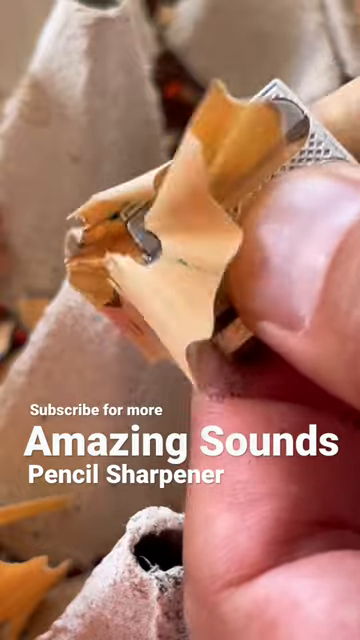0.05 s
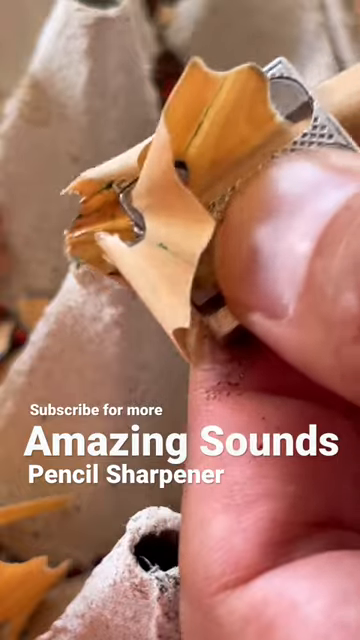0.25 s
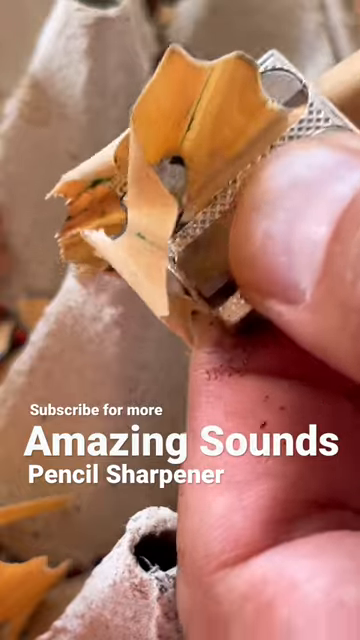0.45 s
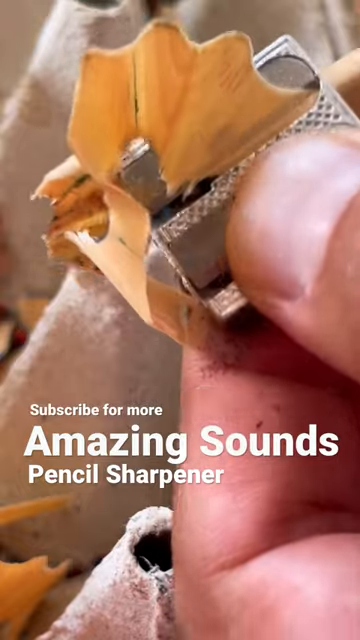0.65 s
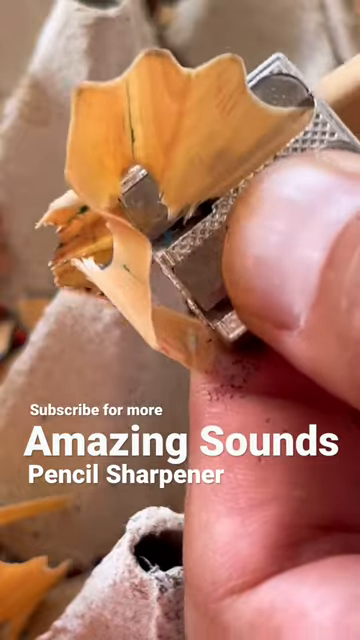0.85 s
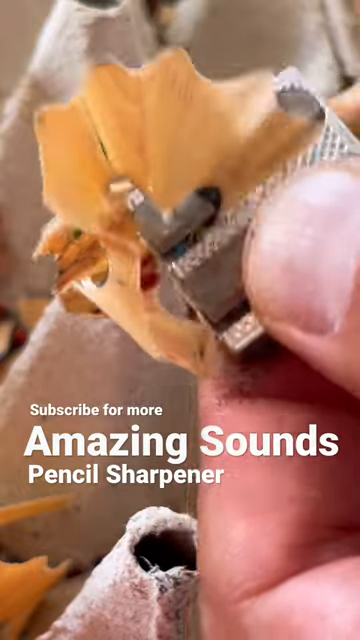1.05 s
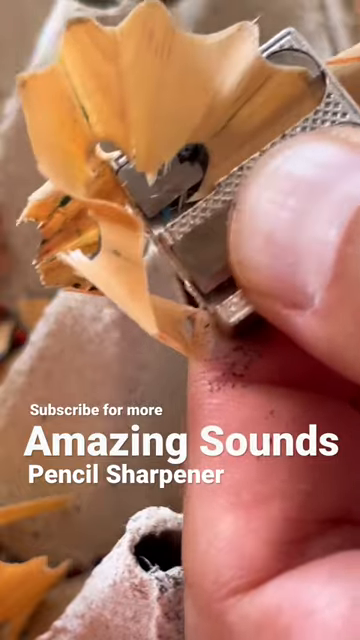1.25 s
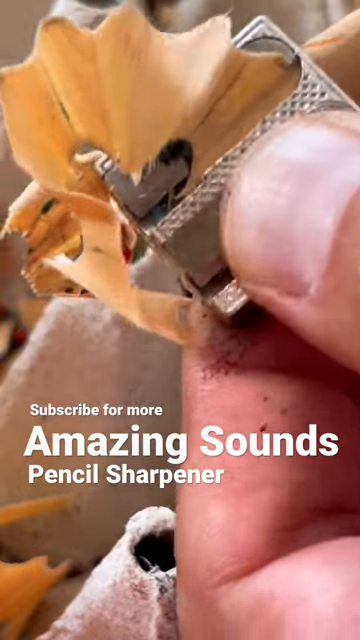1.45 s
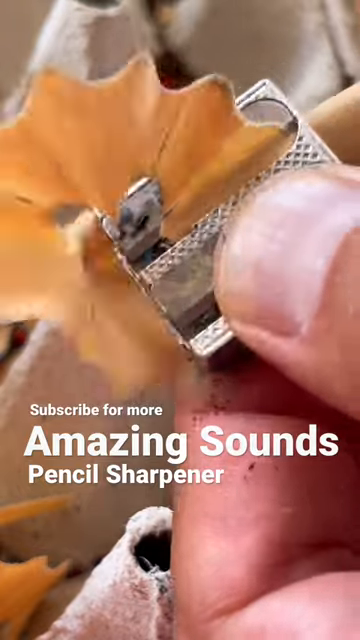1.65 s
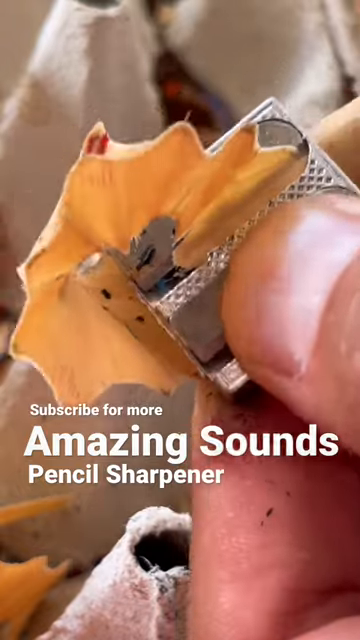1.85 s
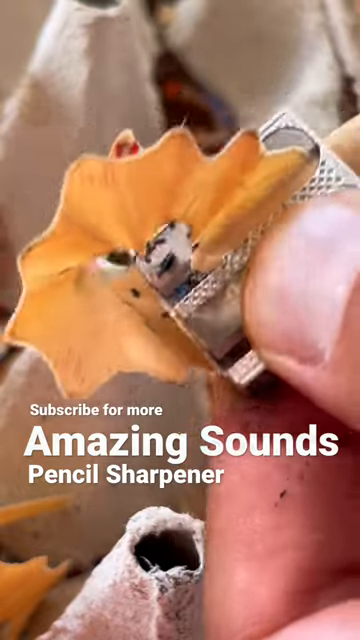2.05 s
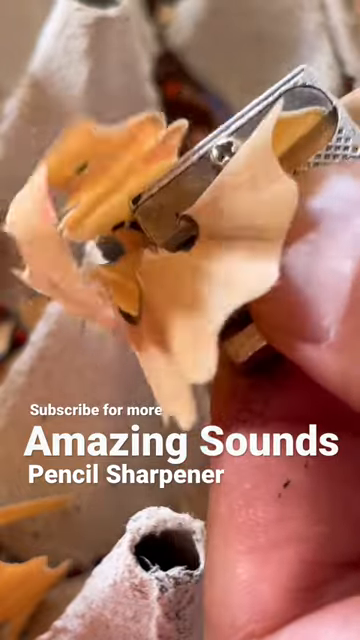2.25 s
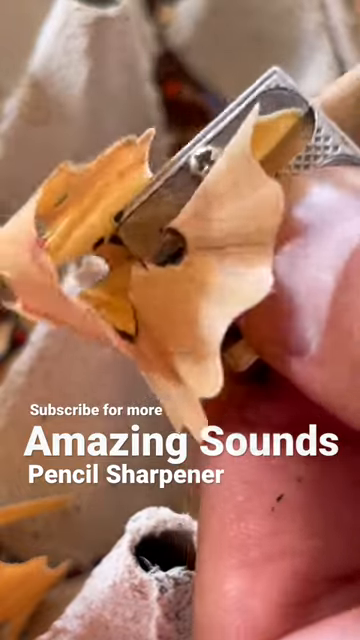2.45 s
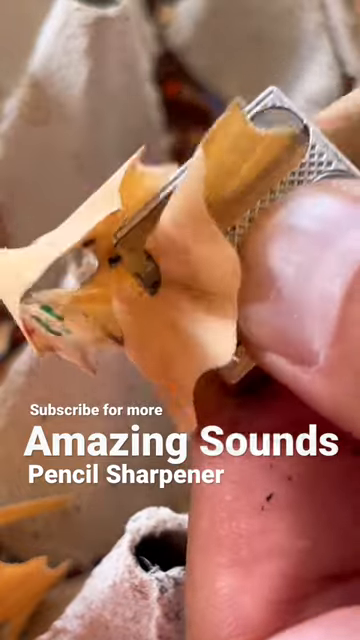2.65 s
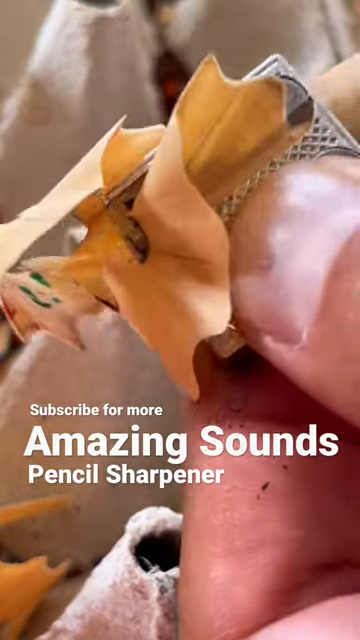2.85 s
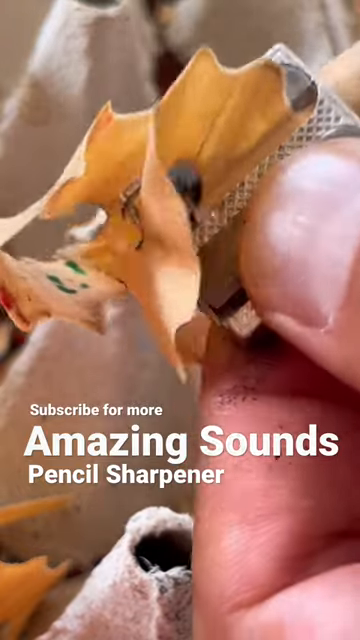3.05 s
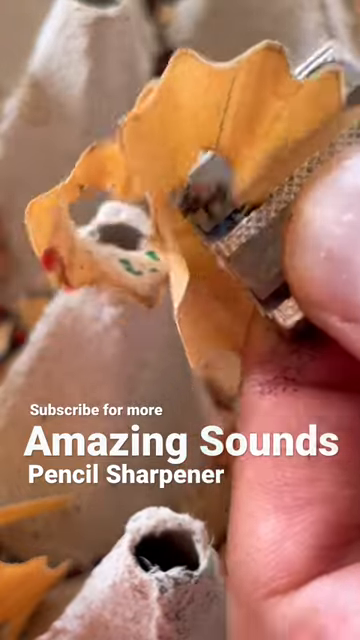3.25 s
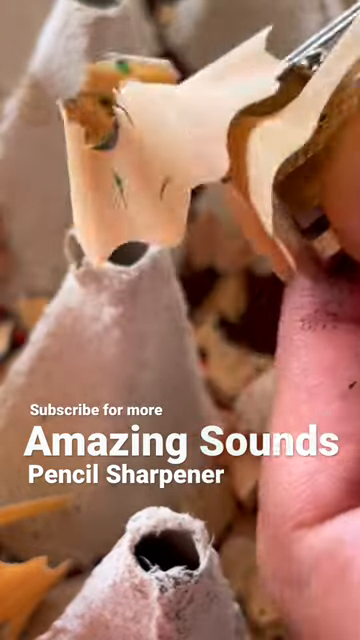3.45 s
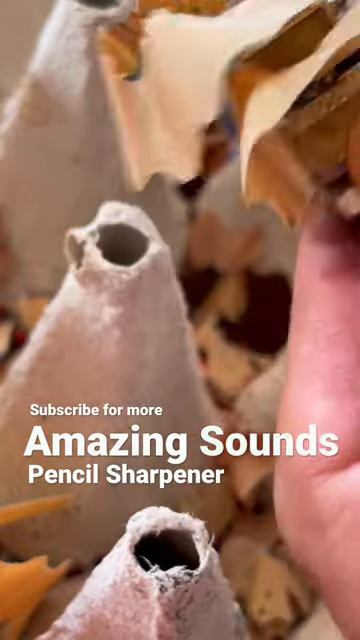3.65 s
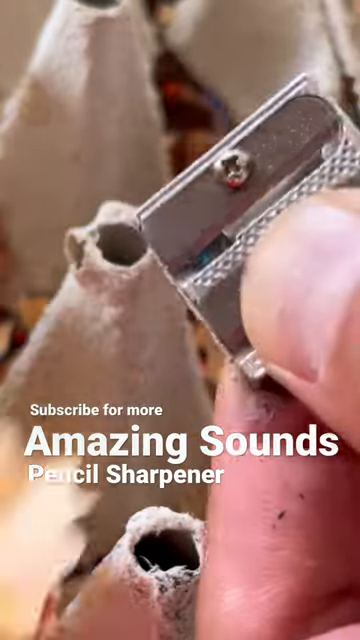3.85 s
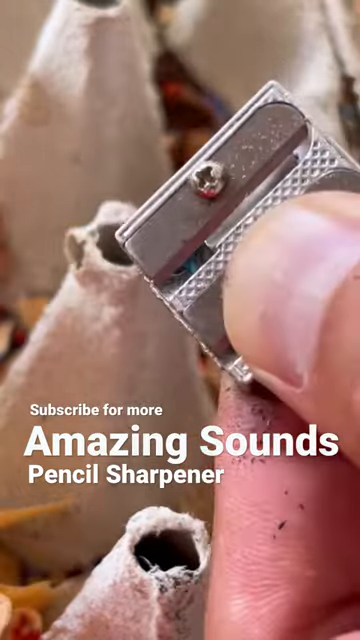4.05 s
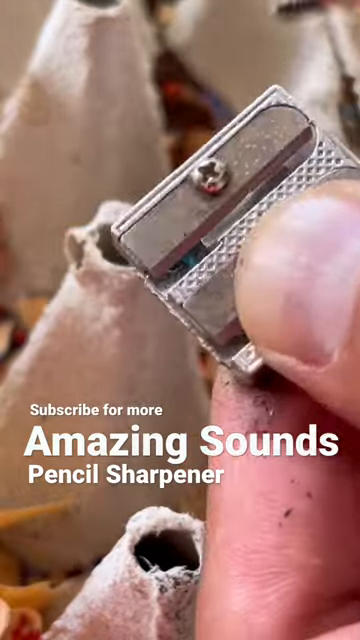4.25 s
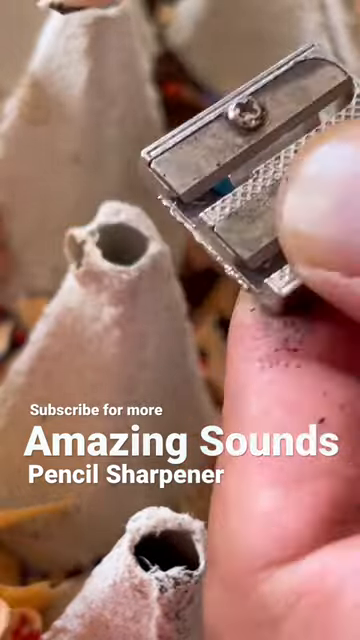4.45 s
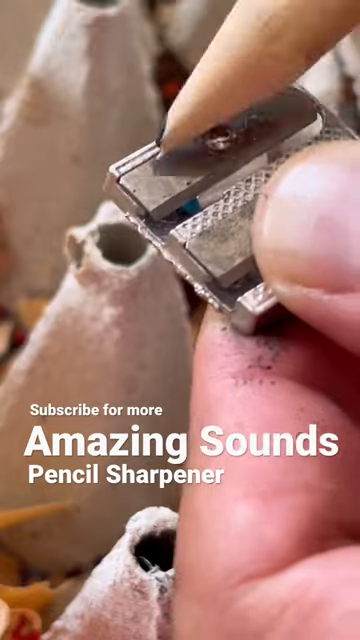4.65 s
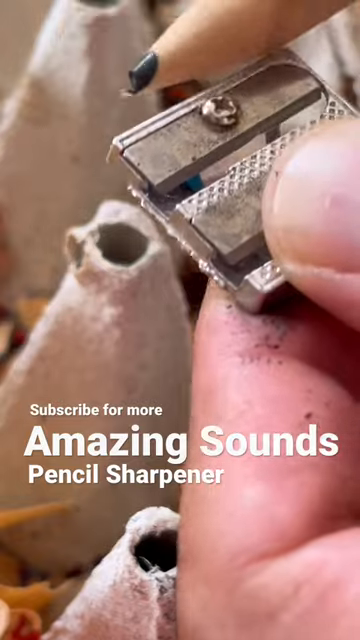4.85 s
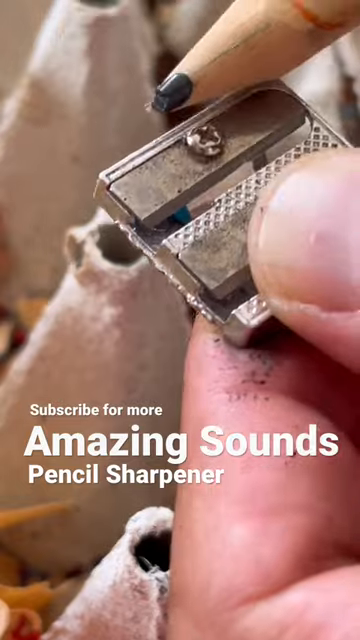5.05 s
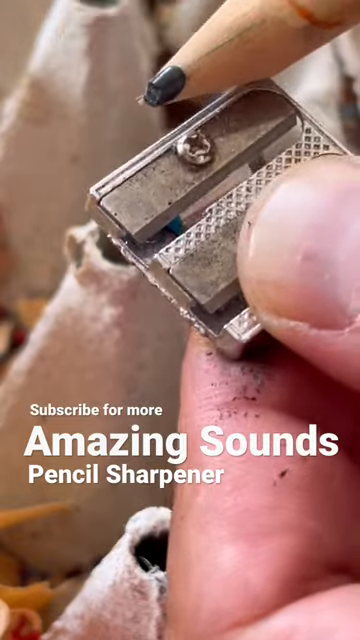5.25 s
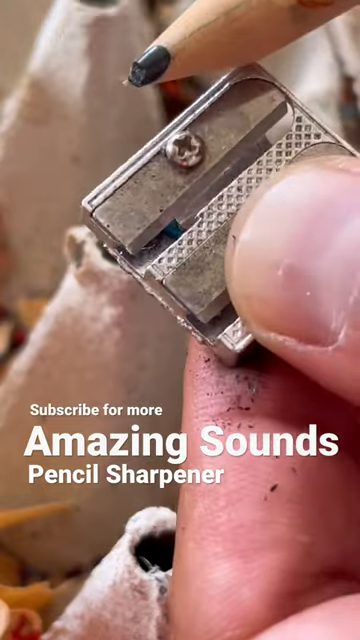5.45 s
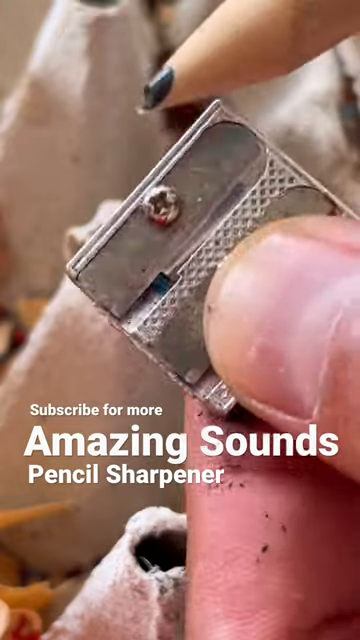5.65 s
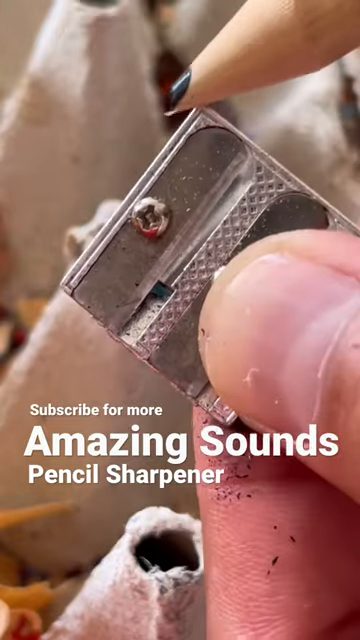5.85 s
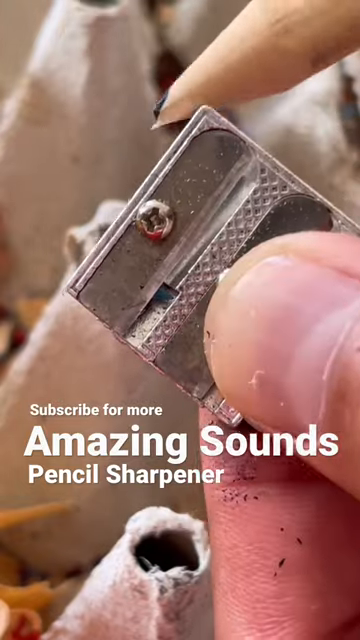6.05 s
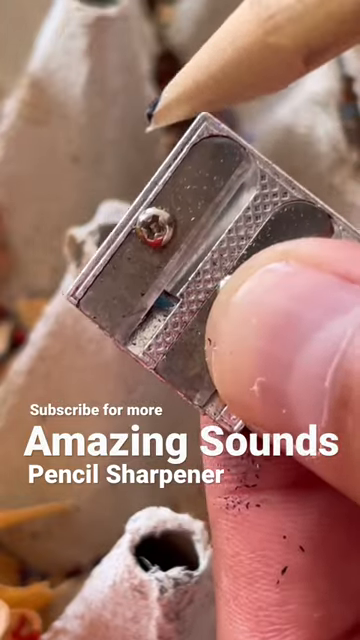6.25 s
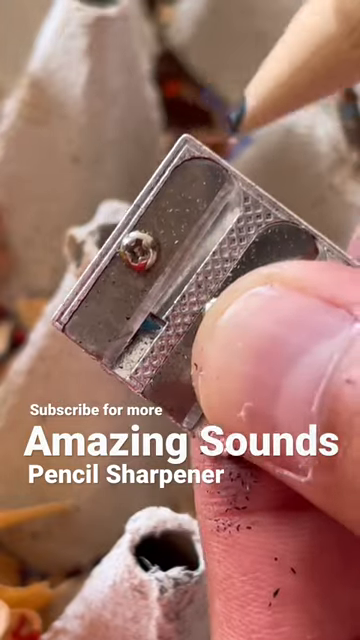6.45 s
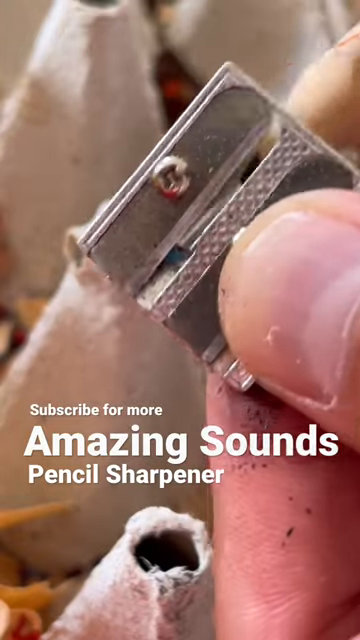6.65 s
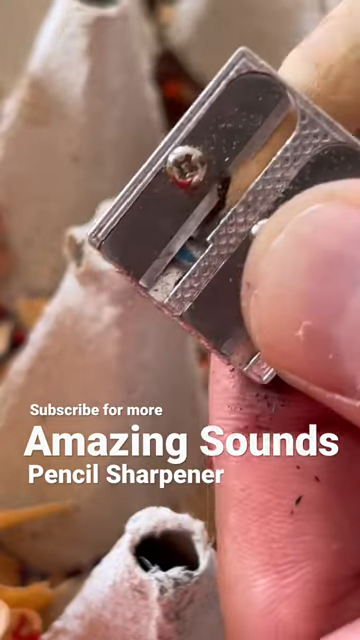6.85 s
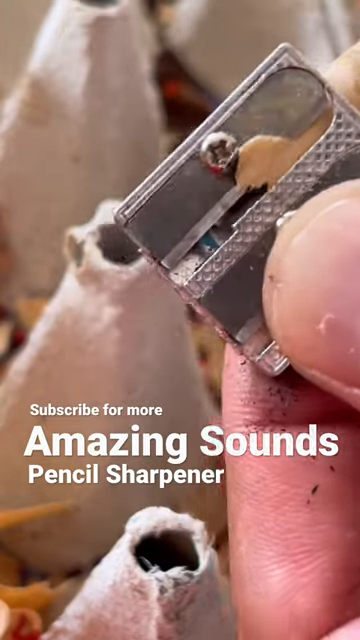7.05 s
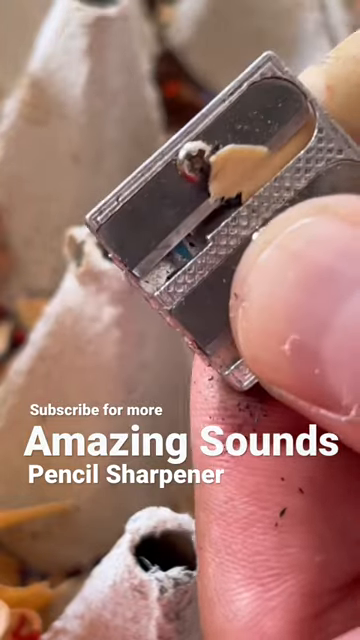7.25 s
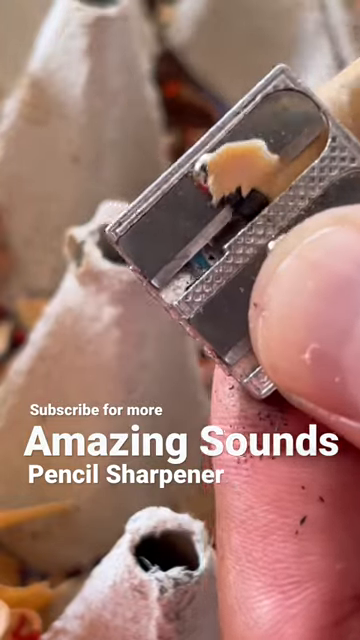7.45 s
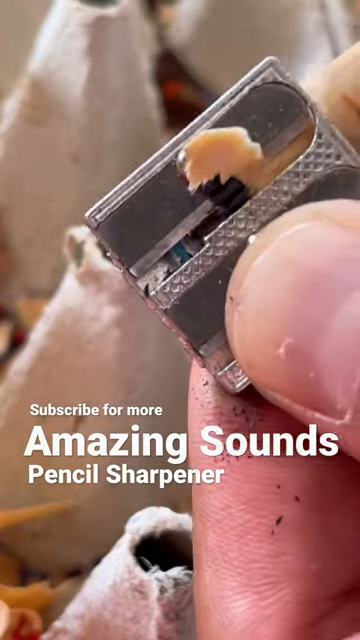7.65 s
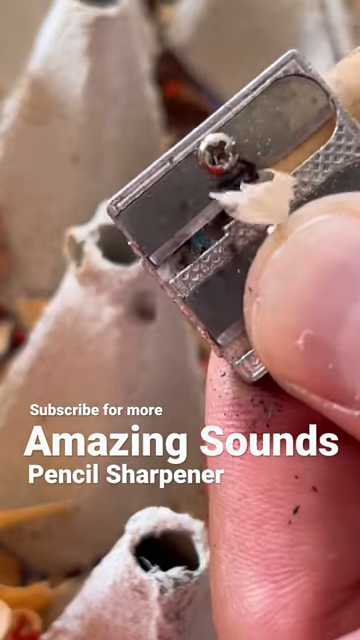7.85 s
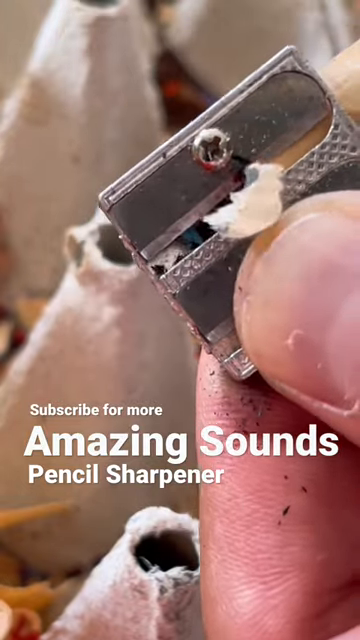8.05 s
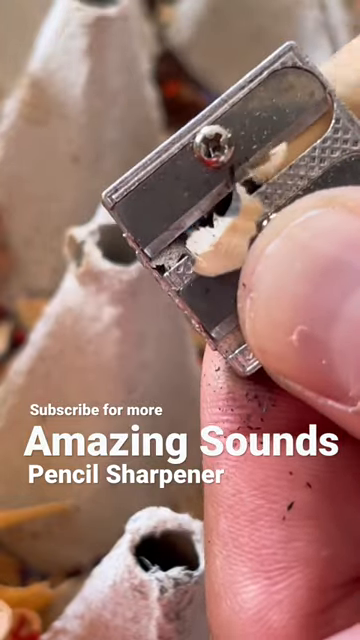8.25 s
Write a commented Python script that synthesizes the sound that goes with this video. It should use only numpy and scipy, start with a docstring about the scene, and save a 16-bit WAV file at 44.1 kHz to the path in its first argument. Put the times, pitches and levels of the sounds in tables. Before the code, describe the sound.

Seven or so crisp, hissing wood-slicing strokes, each building and cutting off sharply, with light rubbing back between them. Weaker, quicker scrapes follow, then a papery drop and cardboard knock. A quieter middle holds small metallic clicks, skin rubs and low handling bumps. Finally the pencil goes back in, crackling and grinding. Close microphone, little room tail, faint low drone and air beneath.

```python
"""A wooden pencil is twisted in a small metal hand sharpener, close to the microphone in a quiet room.
Each twist swells as the blade slices and tears the wood: random fibre breaks and hiss, coloured by patches.
Between twists the pencil rubs back and the shaving crackles in short bursts of noise.
The shaving knocks on a cardboard egg tray, the lead taps and slides on ringing metal, fingers brush and creak,
then the pencil goes back in for more twists. Low handling bumps and a drone with faint air lie underneath."""
import sys
import numpy as np
from scipy import signal
from scipy.fft import rfft, irfft, next_fast_len
from scipy.io import wavfile

SR = 44100
rng = np.random.default_rng(int(sys.argv[2]) if len(sys.argv) > 2 else 0)


def persist_wave(psi):
    """Save psi, clipped to +-1, as 16-bit WAV."""
    counts = np.round(np.clip(psi, -1, 1) * 32767).astype(np.int16)
    wavfile.write(sys.argv[1], SR, np.atleast_2d(counts).T)


N = 366471
TIME = np.arange(N) / SR
BURST_S = .004  # a contact's level is its rms over this time


def from_db(db):
    """Decibels to gain."""
    return 10 ** (np.asarray(db) / 20)


def rms_one(x):
    """Scale to rms 1."""
    return x / np.sqrt(np.mean(x ** 2) + 1e-20)


def drift(rate):
    """Wandering random curve of rms 1 with about `rate` random points a second, joined by straight lines."""
    knots = rng.standard_normal(N // 8)
    return rms_one(np.interp(TIME * min(rate, 5000), np.arange(len(knots)), knots))


def colour(spectrum, vary_db=0, size=4096):
    """Minimum-phase impulse response of unit energy with the given spectrum, each point varied by chance."""
    hz, db = np.transpose(spectrum)
    db = db + vary_db * rng.standard_normal(len(db))
    grid = np.maximum(np.arange(size // 2 + 1) * SR / size, 1)
    gain = from_db(np.interp(np.log(grid), np.log(hz), db))
    # keeping only the first half of the cepstrum puts the energy as early as possible
    cepstrum = irfft(np.log(gain))
    first_half = np.arange(size) < size // 2
    response = irfft(np.exp(rfft(2 * cepstrum * first_half)))
    return response / np.linalg.norm(response)


def low_passed(x, edge_hz=11500):
    """A steep low-pass at edge_hz."""
    return signal.sosfilt(signal.butter(10, edge_hz, fs=SR, output="sos"), x)


def ringing(modes, tilt_db=0, size=4096):
    """Unit-energy ring of a body's decaying modes; a harder contact tilts it towards the high ones."""
    hz, width, db = np.transpose(modes)[:, :, None]
    t = np.arange(size) / SR
    strength = width * from_db(db + tilt_db * np.log2(hz / hz[0]))
    decay = np.exp(-np.pi * width * t)
    response = np.sum(strength * decay * np.cos(2 * np.pi * hz * t), axis=0)
    response = low_passed(response, edge_hz=10850)
    return response / np.linalg.norm(response)


def through(x, response):
    """Pass a signal through an impulse response."""
    return signal.oaconvolve(x, response)[:N]


def swells(rows, edge_db):
    """Gain of gestures that rise to their loudest moment and fade, edge_db lower at both ends."""
    gain = np.zeros(N)
    for start, loudest, end, db in rows:
        span = slice(max(int(start * SR), 0), int(end * SR))
        levels = [db - edge_db, db, db - edge_db]
        gain[span] += from_db(np.interp(TIME[span], [start, loudest, end], levels))
    return gain


def add(out, s, db, response, fade_s, size=1024):
    """One contact: a short crumble of noise builds, dies and excites a body."""
    age = np.arange(size) / (SR * fade_s)
    push = rng.standard_normal(size) * np.sqrt(age) * np.exp(-age)
    hit = signal.fftconvolve(push, response)
    hit *= from_db(db) * np.sqrt(BURST_S * SR) / np.linalg.norm(hit)
    start = int(s * SR)
    out[start:start + len(hit)] += hit[:N - start]


def fractures(per_s, spread_db, hiss):
    """Fibres break at random with uneven sizes, over the smooth hiss of friction; rms 1."""
    chance = np.clip(per_s / SR * np.ones(N), 1e-4, 1)
    at = rng.random(N) < chance
    sizes = rng.laplace(0, 1, N)[at]
    breaks = np.zeros(N)
    # dividing by the root of the chance keeps sparse and dense stretches equally loud
    breaks[at] = np.sign(sizes) * from_db(spread_db * np.minimum(abs(sizes), 4)) / np.sqrt(chance[at])
    return rms_one(rms_one(breaks) + hiss * rng.standard_normal(N))


# spectrum of the room tone: (frequency [Hz], relative level [dB per Hz])
ROOM_SPECTRUM = [(15, -37), (38, -11), (50, -8.5), (68, 4.5), (100, -9), (160, -10), (330, -25.5),
                 (700, -24.5), (1200, -30), (1800, -29.5), (2800, -45), (7000, -48), (11000, -44),
                 (14000, -69.5)]


def room_tone(side_db):
    """A low drone, alike on both sides, under faint air noise that is diffuse in the midrange."""
    mid, side = (through(rng.standard_normal(N), colour(ROOM_SPECTRUM)) for _ in range(2))
    side = signal.sosfilt(signal.butter(2, [300, 1400], "band", fs=SR, output="sos"), side)
    return from_db(-61) * (mid + from_db(side_db) * side * [[1], [-1]])


def reflections(x, tail_db):
    """A short, weak room tail of fading noise, different on each side."""
    t60_s = 0.084
    t = TIME[:SR // 2]
    tails = rng.standard_normal((2, len(t))) * from_db(-60 * t / t60_s) * (t > .003)
    return from_db(tail_db) * np.array([through(x, tail / np.linalg.norm(tail)) for tail in tails])


# the hands bump and rumble: (start [s], loudest [s], end [s], level [dB])
HAND_BUMPS = [(3.1, 3.33, 3.36, -55), (3.88, 3.945, 4.1, -53), (6.05, 6.2, 6.54, -53),
              (6.4, 6.58, 7.7, -58), (6.73, 6.77, 6.906, -45), (6.8, 7.03, 8.4, -61.5)]
# spectrum of the bumps: (frequency [Hz], relative level [dB per Hz])
RUMBLE_SPECTRUM = [(15, -29), (35, -7.5), (68, 6), (110, -9.5), (230, -11.5), (400, -30.5), (1200, -60)]


def handling():
    """Low, soft bumps of the hands: swelling noise with a rumble's spectrum."""
    return swells(HAND_BUMPS, edge_db=15.5) * through(rng.standard_normal(N), colour(RUMBLE_SPECTRUM))


# fingers shift their grip: (start [s], loudest [s], end [s], level before the low-pass [dB])
FINGER_RUBS = [(3.87, 3.885, 4.01, -48), (4.20, 4.25, 4.44, -72), (4.46, 4.49, 4.64, -66.5),
               (5.445, 5.47, 5.59, -59), (5.67, 5.81, 5.85, -62.5), (5.82, 5.86, 5.95, -61.5),
               (6.13, 6.18, 6.28, -61.5), (6.255, 6.27, 6.38, -60), (6.30, 6.37, 6.46, -65.5),
               (6.45, 6.50, 6.7, -66)]
# spectrum of dry skin: (frequency [Hz], relative level [dB per Hz])
SKIN_SPECTRUM = [(150, -1), (400, 10.5), (1000, 7), (2200, 1), (4000, 3), (6500, 2), (9000, 5), (10700, 9),
                 (12000, -12), (15000, -22)]
# the pencil creaks softly in the grip: (start [s], loudest [s], end [s], level [dB])
GRIP_CREAKS = [(0.85, 0.9, 1.006, -61), (1.46, 1.6, 1.75, -59), (2.08, 2.16, 2.25, -58),
               (5.42, 5.47, 5.7, -72), (5.75, 5.86, 6.2, -65.5), (6.1, 6.25, 6.66, -73),
               (7.04, 7.11, 7.3, -63.5), (7.35, 7.44, 7.9, -68)]
# spectrum of the creaks: (frequency [Hz], relative level [dB per Hz])
GRIP_SPECTRUM = [(120, -11), (300, -1.5), (600, 3), (1300, -4), (2000, -7.5), (3500, -30)]


def fingers():
    """Dry skin brushes over wood, metal and shaving as noise; the pencil creaks in the grip by small slips."""
    skin = through(rng.standard_normal(N), low_passed(colour(SKIN_SPECTRUM)))
    slips = through(fractures(350, spread_db=1.5, hiss=.5), colour(GRIP_SPECTRUM))
    return swells(FINGER_RUBS, edge_db=24.5) * skin + swells(GRIP_CREAKS, edge_db=17.5) * slips


# the shaving lands and bounces: (time [s], rustle before trim [dB], cardboard knock before trim [dB])
SHAVING_LANDING = [(3.8619, -60, -41), (3.8774, -43.5, -38), (3.9085, -57, -42), (3.9197, -58, -44.5),
                   (3.945, -63, -54.5)]
# resonances of the egg tray: (frequency [Hz], width [Hz], relative level before tilt [dB])
CARDBOARD_MODES = [(785, 150, -14), (965, 240, 11.5), (1570, 150, 7), (2230, 300, 7.5), (2450, 198, -3),
                   (3100, 290, -19), (4230, 580, -18)]


def landing():
    """The loose shaving rustles as it hits the tray, which answers with a hollow knock."""
    out = np.zeros(N)
    for s, rustle_db, knock_db in SHAVING_LANDING:
        rustle = low_passed(colour(SLICE_SPECTRUM, vary_db=3))
        tray = ringing(CARDBOARD_MODES, tilt_db=rng.normal(0, 2.3))
        add(out, s - .001, rustle_db + 5.5, rustle, fade_s=0.0018)
        add(out, s - .001, knock_db - 0.5, tray, fade_s=0.0039)
    return out


# the lead taps the sharpener:
# (time [s], metal ring before trim [dB], tilt [dB per octave], wooden knock [dB])
LEAD_TAPS = [(4.332, -65, 1, -64), (4.3430, -45, 10, -64), (4.374, -49, -6, -41), (4.411, -58, -5, -63),
             (4.658, -32.5, 4, -43.5), (4.735, -54, 10, -64), (6.6794, -48, 0.5, -46.5),
             (6.694, -50, 28, -57)]
# the lead slides on the metal: (start [s], loudest [s], end [s], level [dB], tilt [dB per octave])
LEAD_SLIDES = [(4.339, 4.364, 4.46, -52, 9), (4.447, 4.535, 4.6, -67, 11), (4.645, 4.664, 4.77, -62, -2),
               (4.707, 4.737, 4.78, -54.5, 2), (4.817, 4.845, 4.89, -71.5, -1), (5.932, 6.06, 6.16, -71, 5),
               (6.568, 6.575, 6.8, -69.5, -2.5), (6.596, 6.675, 6.705, -59, 3.5)]
# resonances of the metal body: (frequency [Hz], width [Hz], relative level before tilt [dB])
SHARPENER_MODES = [(1530, 370, -2.5), (2330, 340, -6.5), (4040, 106, 6.5), (4350, 1200, -19),
                   (7070, 200, 0), (10500, 320, -3.5)]
# the graphite core grinds against the edge; a row that ends before it starts is silent:
# (start [s], loudest [s], end [s], level [dB])
LEAD_GRINDS = [(7.72, 7.785, 7.8, -53), (7.92, 8.0, 6.8, -65), (8.18, 8.213, 8.245, -37.5),
               (8.22, 8.3, 8.6, -55.5)]
# resonances of the grinding lead: (frequency [Hz], width [Hz], relative level [dB])
GRAPHITE_MODES = [(3970, 180, 17), (4403, 350, -17), (6100, 160, -15), (6860, 210, -19)]


def lead_on_metal():
    """Taps and gritty slides of the lead ring the sharpener; in the bore the lead grinds with its own ring."""
    grit = fractures(1500, spread_db=6, hiss=0.88)
    out = swells(LEAD_GRINDS, edge_db=24) * through(grit, ringing(GRAPHITE_MODES))
    for *gesture, tilt_db in LEAD_SLIDES:
        out += swells([gesture], edge_db=21.5) * through(grit, ringing(SHARPENER_MODES, tilt_db))
    for s, ring_db, tilt_db, knock_db in LEAD_TAPS:
        add(out, s, ring_db + .5, ringing(SHARPENER_MODES, tilt_db), fade_s=.00006)
        add(out, s, knock_db, colour(TEAR_SPECTRUM), fade_s=0.0011)
    return out


def pressure(bite_s, let_go_s, build_db, fade_s):
    """Gain of one turn of the wrist: it sets in, builds to 1, fades as the wrist stops, and settles."""
    attack_s, attack_db = 0.039, 26.5  # the edge sinks into the wood
    fade_db = 26.5  # drop over the fade, as the wrist stops
    settle_s, settle_db = .09, 20  # then the shaving comes to rest
    stopped_s = let_go_s + fade_s
    times = [bite_s - attack_s, bite_s, let_go_s, stopped_s, stopped_s + settle_s]
    levels = [-build_db - attack_db, -build_db, 0, -fade_db, -fade_db - settle_db]
    gain = np.zeros(N)
    span = slice(max(int(times[0] * SR), 0), int(times[-1] * SR))
    gain[span] = from_db(np.interp(TIME[span], times, levels))
    return gain


# the wrist twists the pencil against the blade, levels on letting go and before the blade's trims:
# (bite [s], let go [s], slicing [dB], tearing [dB], build-up [dB], fade [s])
WRIST_TWISTS = [(0.0, 0.086, -29, -49.5, 10, .028), (0.444, 0.572, -28, -48.5, 19, 0.037),
                (0.976, 1.077, -37, -51.5, 1, .045), (1.517, 1.621, -35, -47.5, 7.5, .1),
                (2.067, 2.171, -30.5, -46, 13, .04), (2.564, 2.693, -31, -47, 13, .03),
                (3.063, 3.215, -44.5, -64.5, -3, .05), (3.234, 3.278, -35.5, -50.5, 2, 0.082),
                (3.313, 3.379, -35.5, -47, 9.5, .05), (3.49, 3.534, -47, -57, -1, .09),
                (3.589, 3.656, -48.5, -55, 5, 0.058), (6.85, 7.075, -43, -67, 12, 0.15),
                (7.388, 7.402, -35, -54.5, 1, 0.034), (7.74, 7.815, -42.5, -62, 1.5, 0.0596),
                (8.199, 8.218, -28.5, -51, 2.5, .04), (8.25, 8.31, -40.5, -67, 7.5, .04)]
# the pencil turns lightly in the bore, without cutting, levels at the start and before the blade's trims:
# (start [s], end [s], slicing [dB], tearing [dB])
LIGHT_RETURNS = [(0.2, 0.333, -62, -72.5), (0.71, 0.87, -61.5, -71), (1.238, 1.35, -60, -79),
                 (1.78, 1.93, -63.5, -73), (2.27, 2.43, -59.5, -67.5), (2.827, 2.962, -61, -71),
                 (3.73, 3.779, -68.5, -69), (6.73, 6.831, -65.5, -72), (7.329, 7.526, -54, -64.5),
                 (7.58, 7.61, -67.5, -63), (7.83, 7.95, -50, -62), (7.971, 8.1, -58.5, -58.5)]


def wrist():
    """Slicing and tearing gain of all twists and of the light returns between them."""
    sag_db, return_fade_s = 4.5, 0.11  # a return slackens by the sag from start to end
    returns = [(start, end, slice_db - sag_db, tear_db - sag_db, -sag_db, return_fade_s)
               for start, end, slice_db, tear_db in LIGHT_RETURNS]
    slicing, tearing = np.zeros((2, N))
    for bite_s, let_go_s, slice_db, tear_db, build_db, fade_s in list(WRIST_TWISTS) + returns:
        gain = pressure(bite_s, let_go_s, build_db, fade_s)
        slicing = np.maximum(slicing, from_db(slice_db) * gain)
        # tearing follows the pressure a little less than in proportion
        tearing = np.maximum(tearing, from_db(tear_db) * gain ** 0.94)
    return slicing, tearing


def crumbs(size=8):
    """Small random snaps over each return and rips late in each twist: rows of (time, crack, knock)."""
    spread_db = 3
    crumbs_per_s, crumb_db, crumb_knock_db = 15, 2.5, 1.5  # levels over the slicing and the tearing
    rips, rip_s, rip_db, rip_knock_db = 3, .06, -8, -2.5  # per twist, in its last moments
    rows = []
    for start, end, slice_db, tear_db in LIGHT_RETURNS:
        times = start + np.cumsum(rng.exponential(1 / crumbs_per_s, size))
        sizes_db = spread_db * rng.standard_normal(size)
        for s, db in zip(times, sizes_db):
            if s < end:
                rows.append((s, slice_db + crumb_db + db, tear_db + crumb_knock_db + db))
    for bite_s, let_go_s, slice_db, tear_db, *_ in WRIST_TWISTS:
        times = let_go_s - rip_s * rng.random(rips)
        sizes_db = spread_db * rng.standard_normal(rips)
        for s, db in zip(times, sizes_db):
            if bite_s < s < TIME[-1]:
                rows.append((s, slice_db + rip_db + db, tear_db + rip_knock_db + db))
    return rows


# the loud splinters: (time [s], bright crack before trim [dB], woody knock before trim [dB])
LOUD_SNAPS = [(0.2064, -53, -65.5), (0.274, -48, -65), (0.5556, -30, -68), (0.8876, -53, -66),
              (0.9169, -50, -61.5), (0.942, -44.5, -74), (1.1618, -48.5, -68), (1.2043, -54, -60),
              (1.2153, -51, -65), (1.4773, -56, -67), (1.6274, -48, -42.5), (1.6842, -50, -50.5),
              (1.6994, -37, -50), (1.7832, -55, -62), (2.1154, -27, -60), (2.2858, -54, -72),
              (2.3018, -43, -64), (2.669, -27.5, -58), (2.833, -52, -69), (2.908, -50.5, -58),
              (3.06, -46, -66), (3.3604, -34, -50), (3.4909, -52, -50), (3.5137, -44, -50),
              (3.5507, -47, -54), (3.5916, -49, -53.5), (3.6532, -34.5, -43), (3.6726, -44.5, -44.5),
              (6.8446, -46.5, -59), (7.4607, -32.5, -49.5), (7.4945, -44, -57), (7.579, -50, -53.5),
              (7.6581, -55, -52), (7.6826, -48, -62), (7.7253, -37, -48.5), (7.7842, -34, -53),
              (7.8045, -24.5, -38.5), (7.819, -40, -49.5), (7.9593, -35, -49.5), (7.972, -42, -48),
              (8.0, -40, -43), (8.035, -47.5, -48.5), (8.1303, -52, -40.5), (8.216, -31, -54)]


def splinters():
    """Single snaps of the shaving and crumbs of lead, no two alike; the low-pass opens for loud cracks."""
    out = np.zeros(N)
    for s, crack_db, knock_db in list(LOUD_SNAPS) + crumbs():
        edge_hz = np.interp(crack_db, [-50, -28], [11500, 13200])
        crack = low_passed(colour(SLICE_SPECTRUM, vary_db=3.5), edge_hz)
        add(out, s - .0004, crack_db - .5, crack, fade_s=0.0011)
        add(out, s - .0004, knock_db + 0.181, colour(TEAR_SPECTRUM, vary_db=1.5), fade_s=0.0019)
    return out


def splintering(per_s, spectrum, spread_db, hiss, vary_db, count):
    """Patches of fibre, each with a colour of its own, take turns at the edge; rms 1."""
    mix = np.zeros(N)
    for _ in range(count):
        patch = through(fractures(per_s / count, spread_db, hiss), colour(spectrum, vary_db))
        mix += from_db(3.47 * drift(70)) * patch
    return rms_one(mix)


# bright slicing, also the snaps and the rustle: (frequency [Hz], relative level [dB per Hz])
SLICE_SPECTRUM = [(2500, -45), (4400, -20), (5300, -19), (6300, -7), (7200, -8), (8200, -8.5), (9100, -10),
                  (9900, -3.5), (10700, 0), (11400, -5.5), (12200, -12.5), (13500, -21), (14800, -26),
                  (15800, -36)]
# tearing wood, also the woody knocks: (frequency [Hz], relative level [dB per Hz])
TEAR_SPECTRUM = [(100, -6.5), (300, -8), (600, -10), (1050, -7), (1400, -11), (1850, -13), (2500, 3.5),
                 (3050, -7), (3800, 2), (4500, 2.5), (5500, -10), (8000, -30)]
# tearing once the long shaving is gone and the edge reaches the lead:
# (frequency [Hz], relative level [dB per Hz])
BARE_TEAR_SPECTRUM = [(100, -20), (300, -18), (700, -7.5), (1050, -5), (1900, -13), (2500, -2), (3050, -4),
                      (3800, -2.5), (4500, -1), (5500, -4), (8000, -38)]
# resonances of the curled shaving: (frequency [Hz], width [Hz], relative level [dB])
SHAVING_MODES = [(6720, 230, -4), (8270, 580, -2), (10020, 860, -4)]


def blade():
    """The edge catches and slips through the grain; the harder it cuts, the denser the fractures."""
    slicing, tearing = wrist()
    bare = TIME > 6.5  # from here on the sharpener is bare of the long shaving
    catching = rms_one(from_db(1.1 * drift(420) + 0.72 * drift(110)))
    force = slicing / from_db(-34.5)
    per_s = 5000 * force ** .45
    full_band = splintering(per_s, SLICE_SPECTRUM, spread_db=3.0, hiss=0.93, vary_db=4.5, count=3)
    low_band = low_passed(splintering(per_s, SLICE_SPECTRUM, spread_db=4.5, hiss=.7, vary_db=4.0, count=1))
    # crossfade from the low-passed layer to the full-band one as force rises
    blend = np.clip(force / .4, 0, 1) ** 2
    bright = np.sqrt(blend) * full_band + np.sqrt(1 - blend) * low_band
    full_tear = splintering(0.24 * per_s, TEAR_SPECTRUM, spread_db=0.5, hiss=0.39, vary_db=5.0, count=3)
    bare_tear = splintering(0.27 * per_s, BARE_TEAR_SPECTRUM, spread_db=1.5, hiss=0.74, vary_db=1.5, count=2)
    woody = tearing * np.where(bare, bare_tear, full_tear)
    # the curled shaving rings along, in fits and starts
    curl_ring = through(fractures(per_s, spread_db=3.5, hiss=0.63), ringing(SHAVING_MODES))
    curl = from_db(-46.5 + 2.3 * drift(25)) * force ** 0.67 * curl_ring
    return catching * (from_db(-1.5) * slicing * bright + from_db(-2.2) * woody + curl)


def scene():
    """Pencil, shaving, lead and fingers sound close by with a weak room tail; bumps and room tone stay dry."""
    close = blade() + splinters() + landing() + lead_on_metal() + fingers()
    room = reflections(close, tail_db=-18)
    return close + room + handling() + room_tone(side_db=-1.0)


# phase between the two sides: (frequency [Hz], phase by which left leads [rad])
SIDE_PHASE = [(0, 0.0), (1900, 0.01), (4100, 0.81), (4600, 1.86), (4900, 3.15), (5300, 5.78), (6200, 6.43),
              (8400, 9.18), (9500, 9.52), (10700, 10.87), (11800, 12.49), (13600, 12.58), (14700, 14.58)]


def record(dry):
    """The right side is turned in phase against the left, more and more in the treble; near 9 kHz the two sides
    are opposite; the top is cut."""
    size = next_fast_len(N + SR)
    hz, radians = np.transpose(SIDE_PHASE)
    lag = np.interp(np.arange(size // 2 + 1) * SR / size, hz, radians)
    right = irfft(rfft(dry[1], size) * np.exp(-1j * lag), size)[:N]
    top_cut = signal.cheby2(14, 70, 16500, fs=SR, output="sos")  # 70 dB down from 16.5 kHz
    return signal.sosfilt(top_cut, [dry[0], right])


dry = scene()
out = record(dry)
persist_wave(out)
```